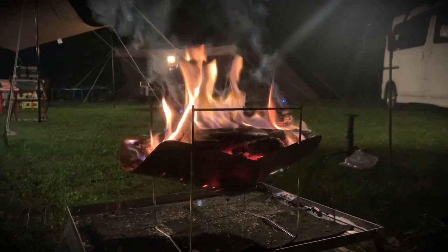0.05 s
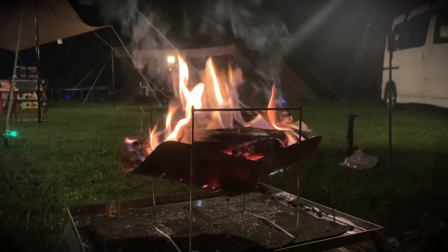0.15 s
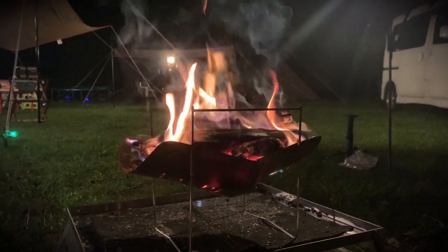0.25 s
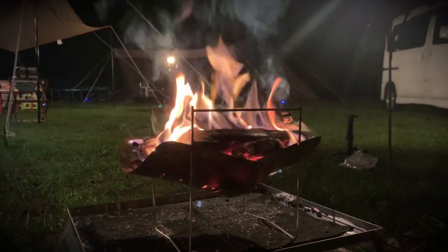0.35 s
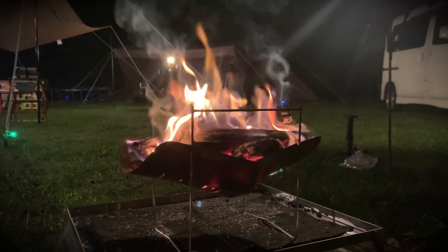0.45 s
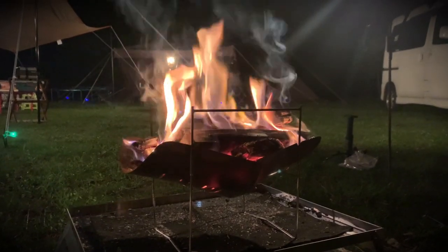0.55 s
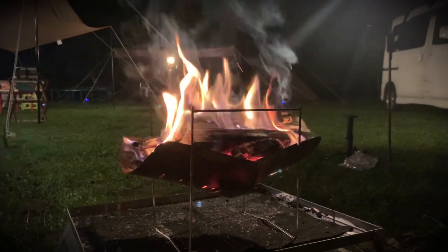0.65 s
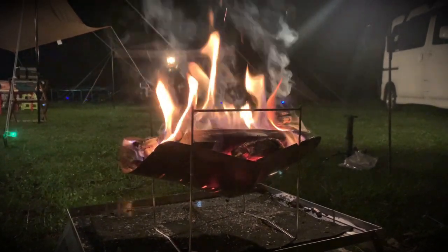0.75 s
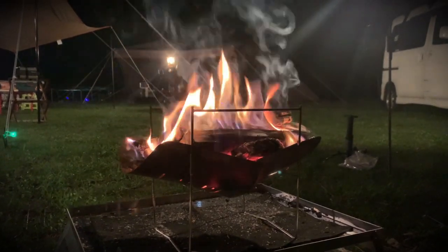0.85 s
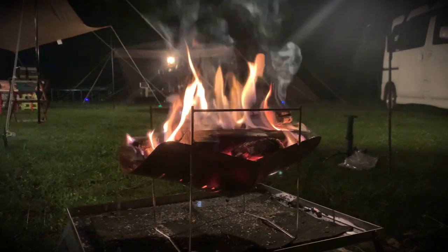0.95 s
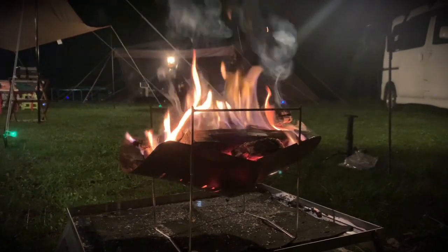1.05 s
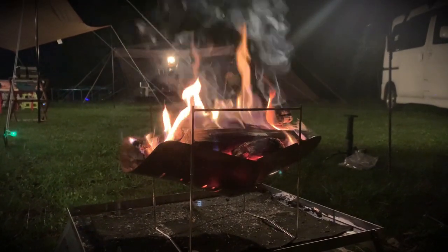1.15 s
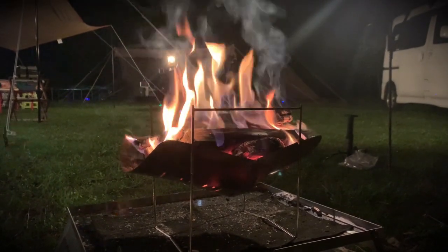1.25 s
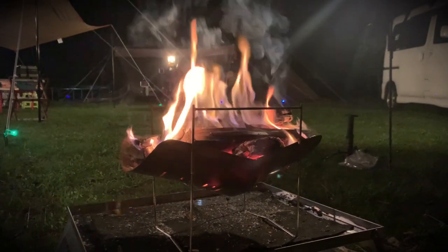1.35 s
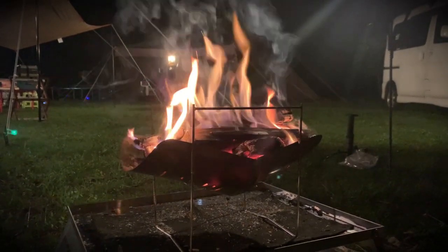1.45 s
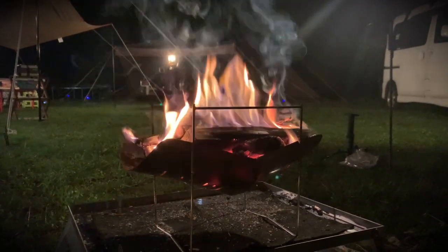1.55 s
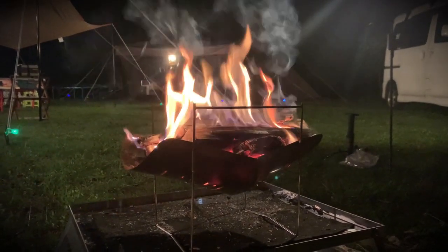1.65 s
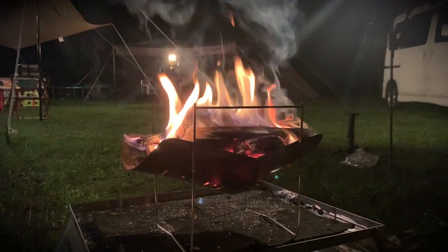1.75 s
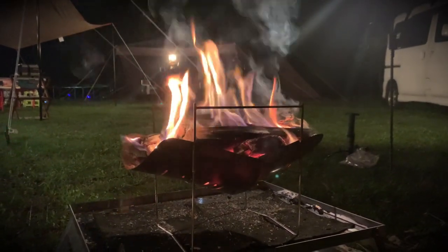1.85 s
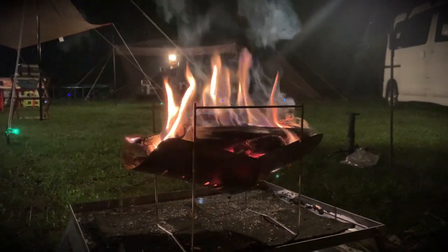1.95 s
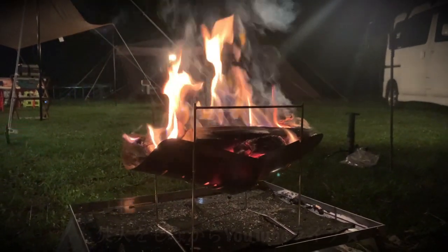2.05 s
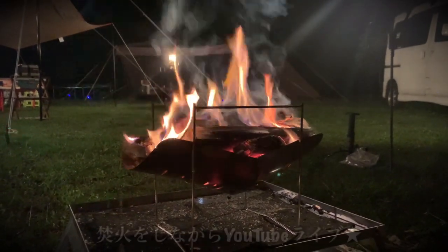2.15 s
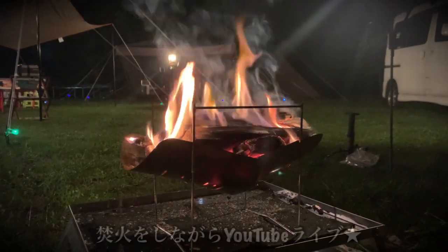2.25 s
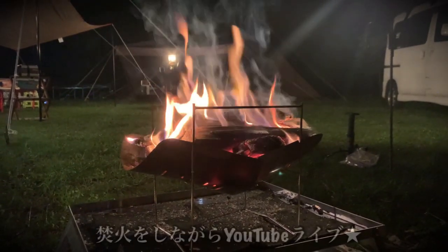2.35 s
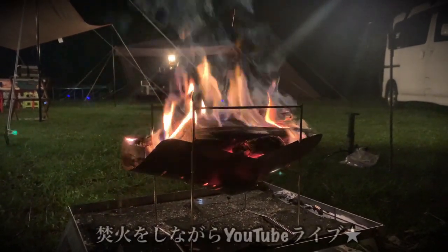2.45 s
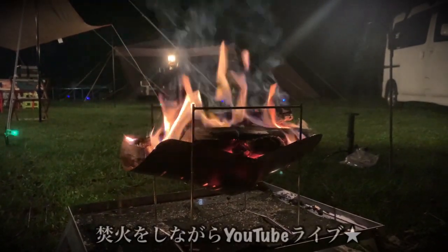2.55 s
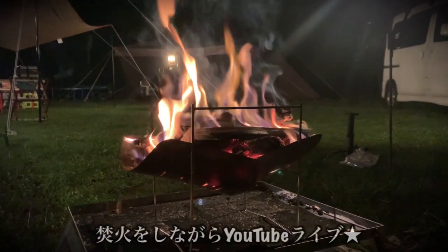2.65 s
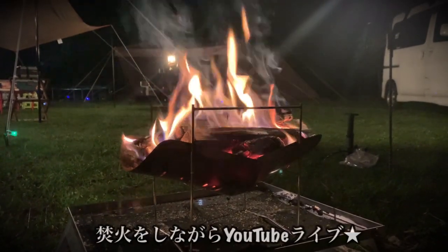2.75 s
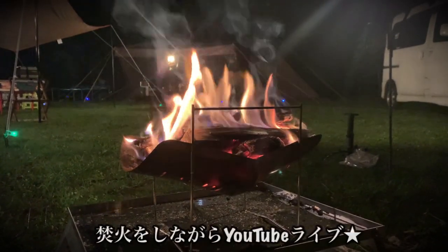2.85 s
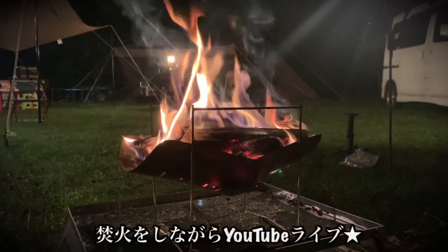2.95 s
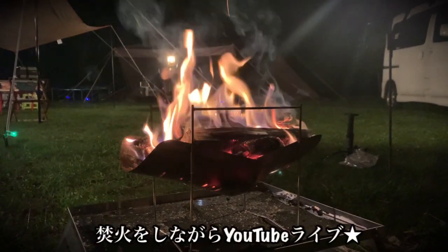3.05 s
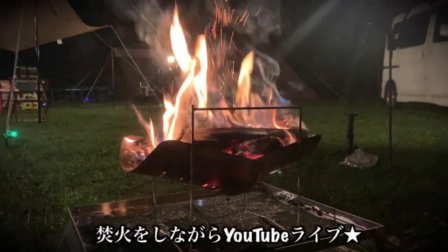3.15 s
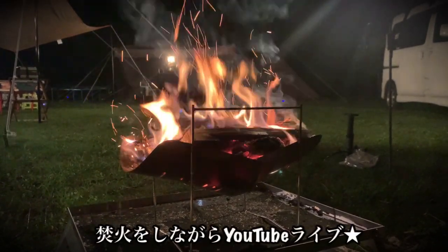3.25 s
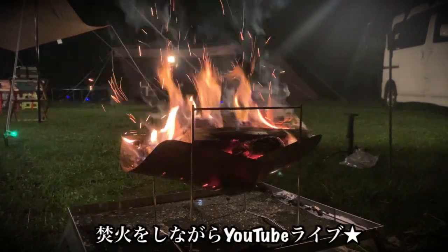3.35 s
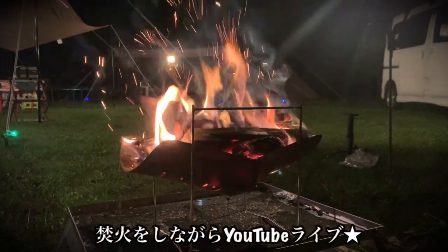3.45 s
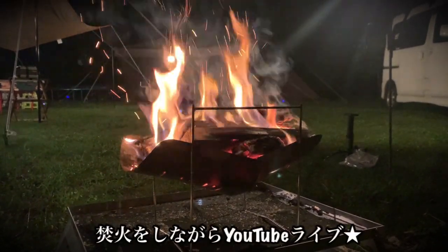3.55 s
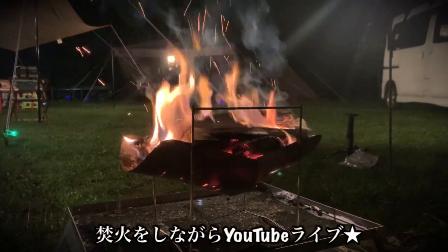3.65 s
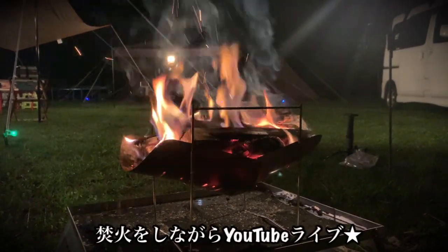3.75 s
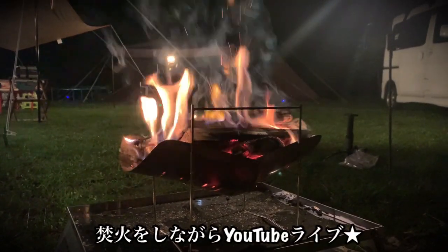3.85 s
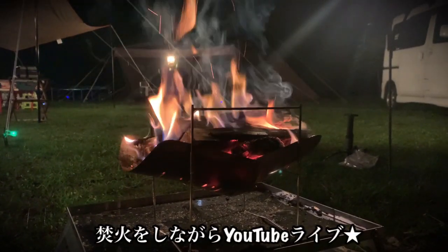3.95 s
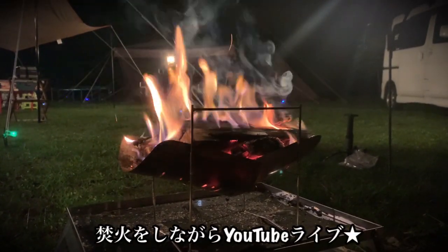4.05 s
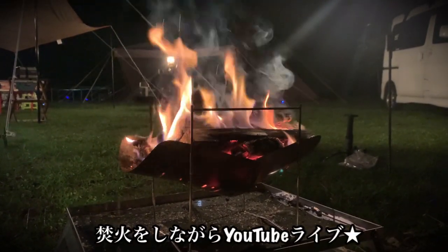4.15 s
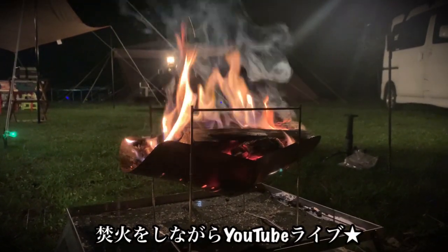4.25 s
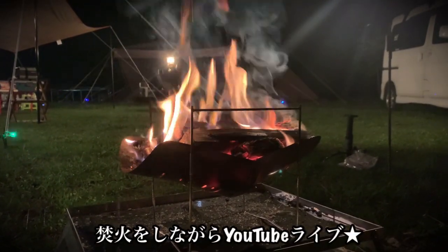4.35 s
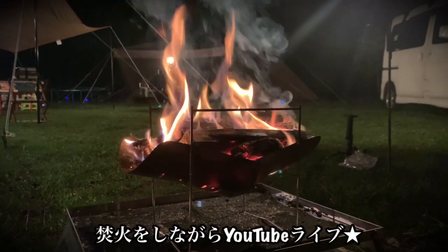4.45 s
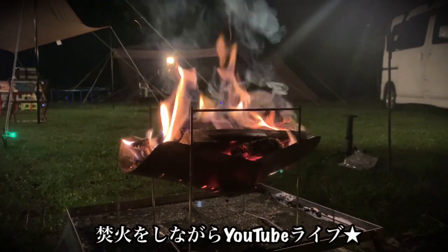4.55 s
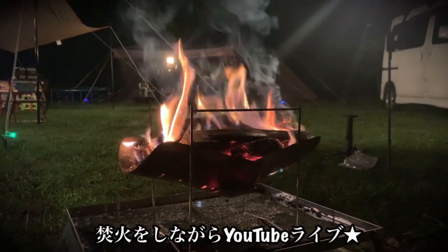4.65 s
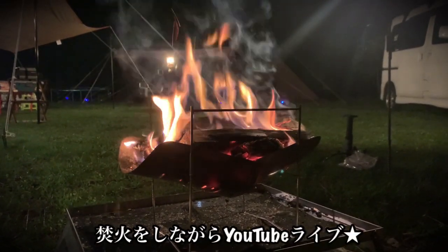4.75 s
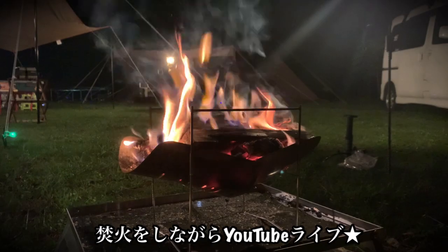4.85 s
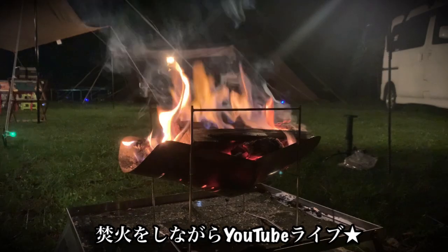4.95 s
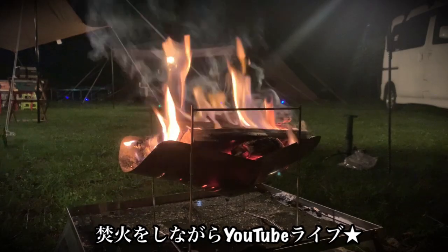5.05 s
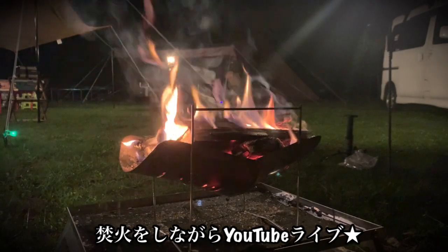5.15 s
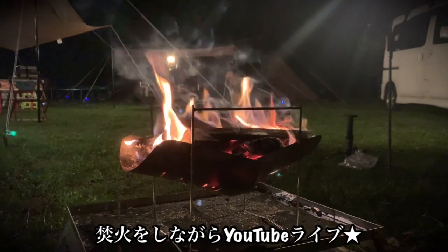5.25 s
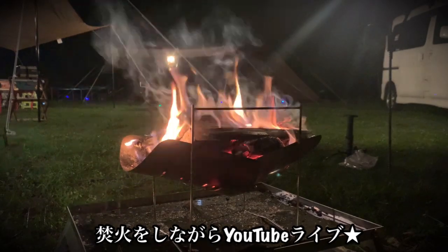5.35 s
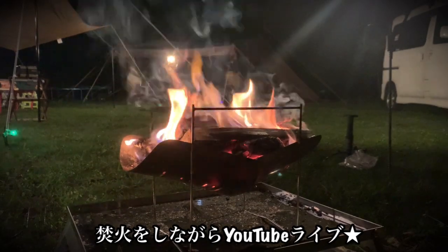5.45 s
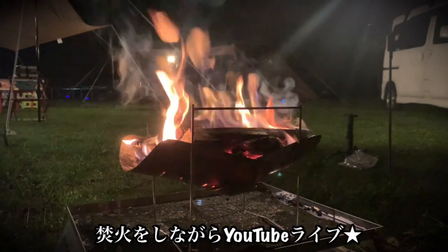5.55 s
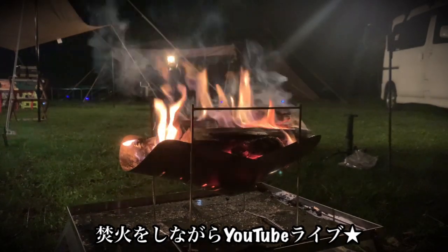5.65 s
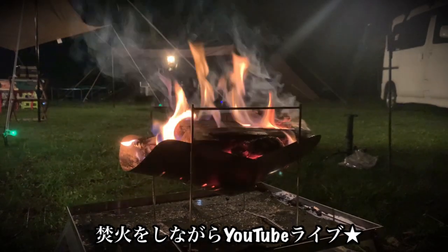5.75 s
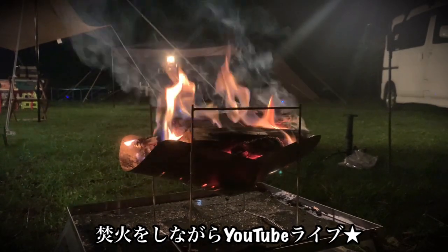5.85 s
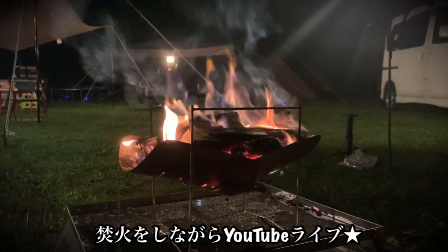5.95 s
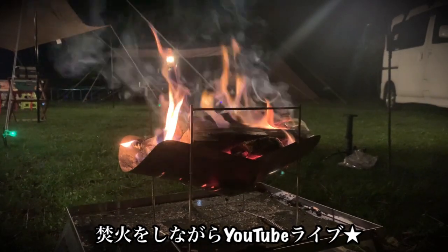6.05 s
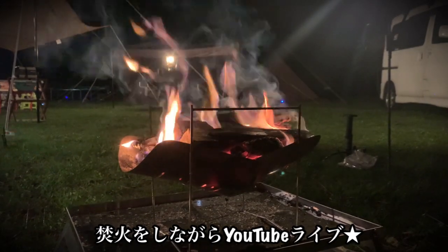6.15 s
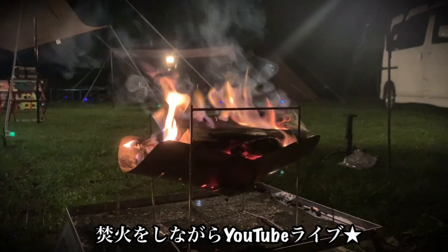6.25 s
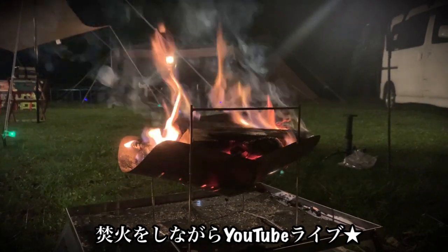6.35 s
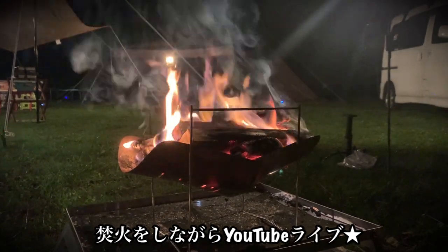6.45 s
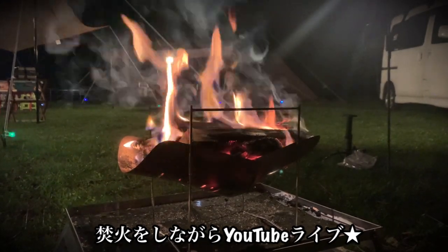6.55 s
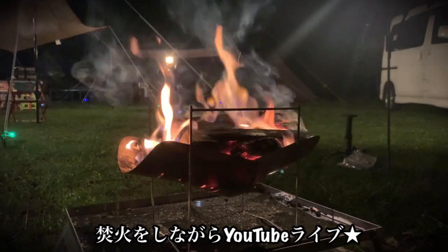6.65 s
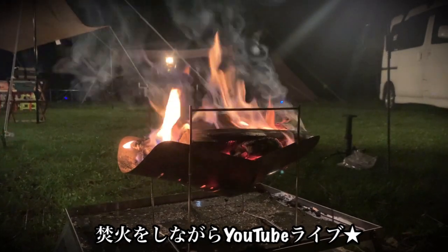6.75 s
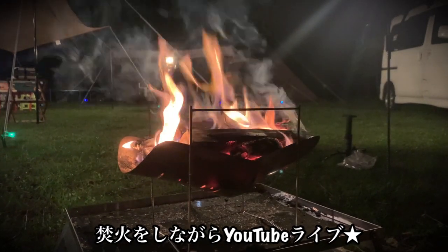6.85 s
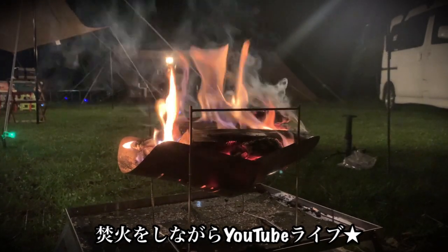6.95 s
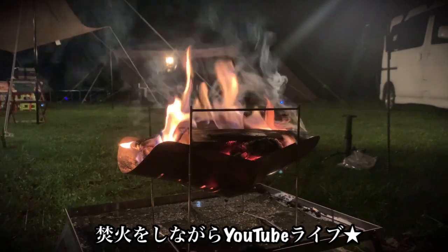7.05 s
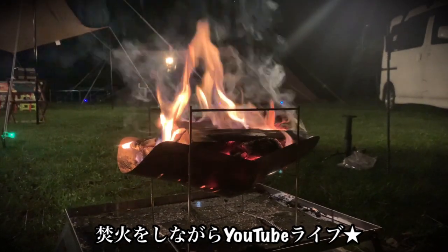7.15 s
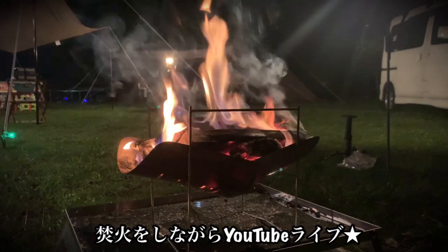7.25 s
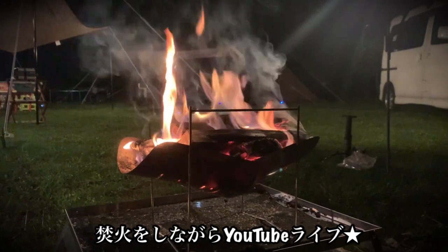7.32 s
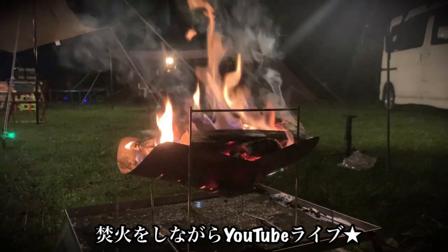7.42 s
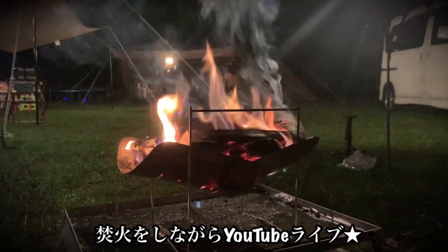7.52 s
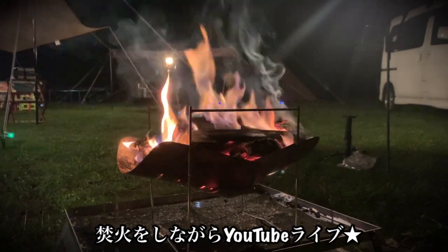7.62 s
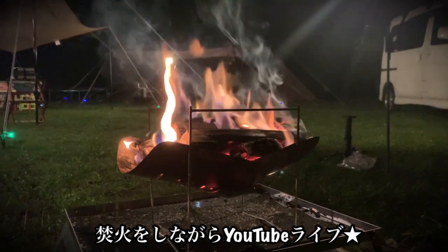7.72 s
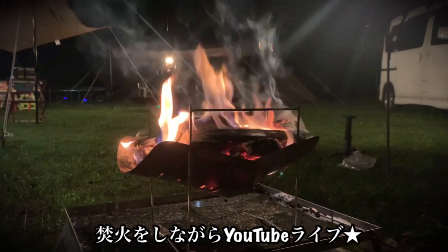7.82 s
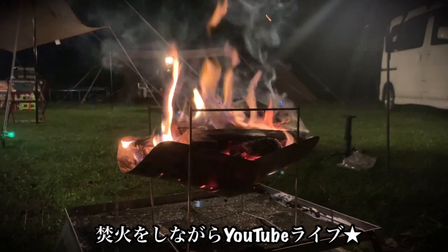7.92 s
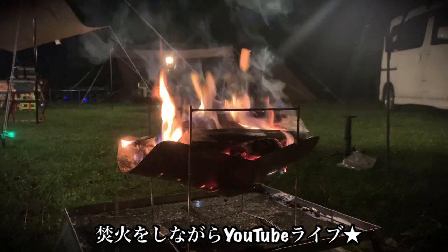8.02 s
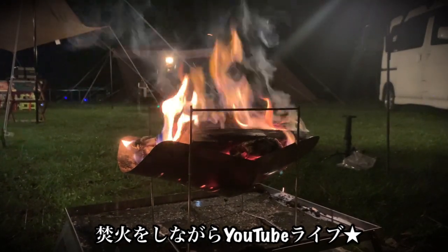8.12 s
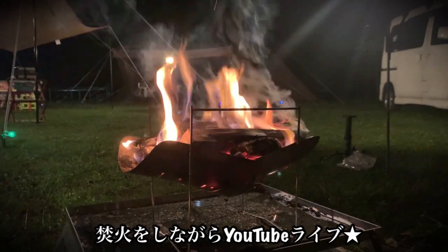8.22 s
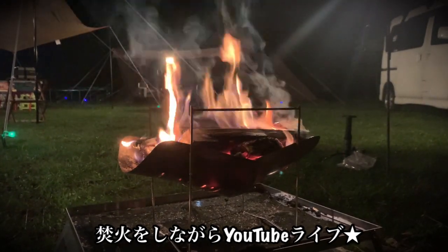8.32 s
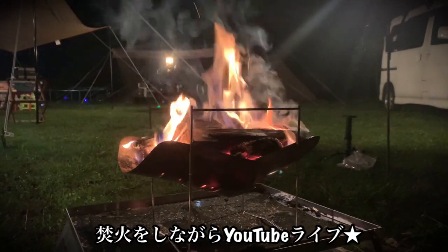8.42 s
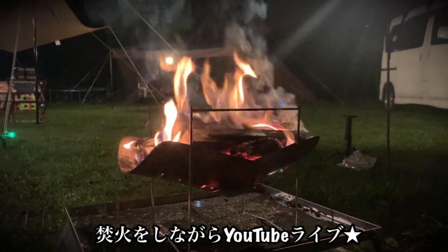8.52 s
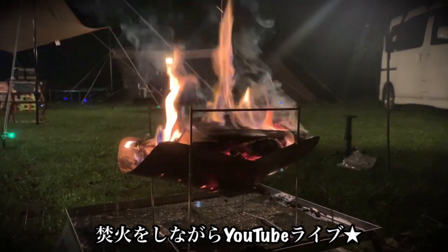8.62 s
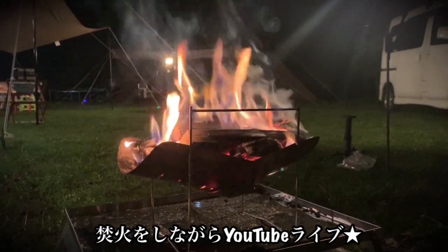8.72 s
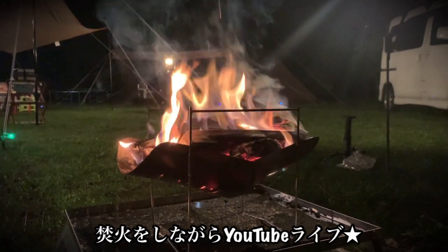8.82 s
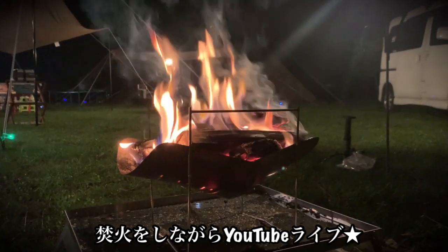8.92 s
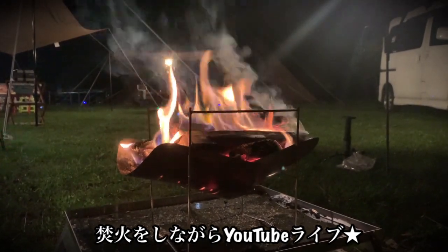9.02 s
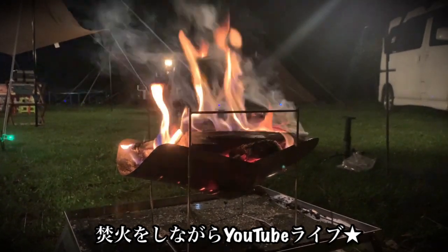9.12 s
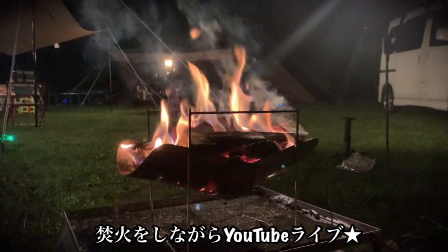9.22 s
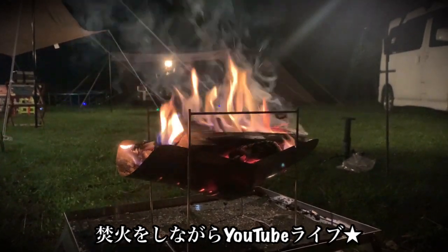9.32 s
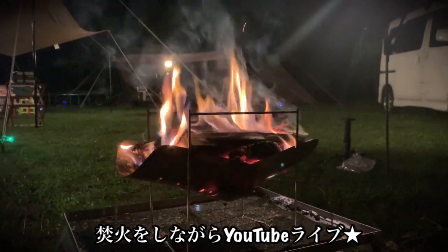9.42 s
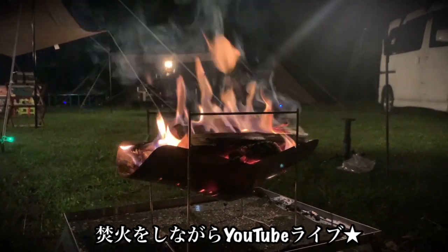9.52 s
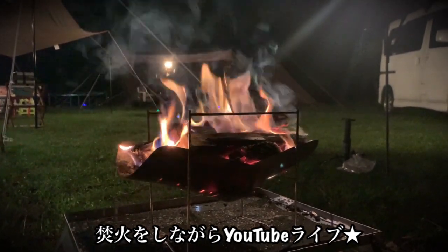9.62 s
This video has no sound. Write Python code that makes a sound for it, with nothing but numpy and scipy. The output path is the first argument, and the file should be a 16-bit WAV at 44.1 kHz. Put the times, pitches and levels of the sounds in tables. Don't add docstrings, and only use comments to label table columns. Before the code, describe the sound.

Flames rumble softly under a bright sizzle of boiling sap, with a breathy steam whistle swelling around three seconds. Dry pops and tiny snaps come irregularly, several loud in the first two seconds. The biggest, just after three, overloads the microphones and the sound ducks for a moment. Quieter crackle follows, then a woody crack near seven and a hissing spurt near nine. Open outdoor air, close stereo.

```python
import sys
import numpy as np
from scipy import signal
from scipy.fft import rfft, irfft, next_fast_len
from scipy.io import wavfile

SR = 44100
rng = np.random.default_rng(int(sys.argv[2]) if len(sys.argv) > 2 else 0)


def generate_wav(sig):
    pcm = np.round(np.clip(np.atleast_2d(sig).T, -1, 1) * 32767).astype(np.int16)
    wavfile.write(sys.argv[1], SR, pcm)


def gain_from_decibels(decibels):
    exponent = np.asarray(decibels, float) / 20
    return 10 ** exponent


N = 426888
TIME = np.arange(N) / SR
SIZE = next_fast_len(N)
HZ = np.maximum(np.fft.rfftfreq(SIZE, 1 / SR), 1)
LEFT_LAG_S = 14 / 44100
IN_PHASE_HZ = 850

# (f/Hz, share 0-1)
STRAIGHT_SHARE = [(40, 0.94), (120, 0.99), (250, 0.87), (500, 0.65), (1400, 0), (2600, 0.25), (4400, 0),
                  (8000, 0.28), (9000, 0.23), (10200, 1), (15000, 1)]
# (t/s, level/dB about its mean)
BLAZE_VIGOUR = [(0, 1), (.8, 0.5), (1.2, -1), (1.55, .5), (1.95, 1), (2.4, -.5), (2.6, 3), (3.0, -0.5),
                (3.35, 2), (3.9, 3), (4.4, 1), (5.4, 2), (6.8, 0.8), (7.2, 2), (8.7, 0.8), (9.05, 2.7),
                (9.3, 0), (9.68, 1.5)]


def rms_one(x):
    return x / np.sqrt(np.mean(x ** 2) + 1e-20)


def in_time(rows):
    return np.interp(TIME, *np.transpose(rows))


def at_hz(points, hz):
    table_hz, value = np.transpose(points)
    return np.interp(np.log(hz), np.log(table_hz), value)


def band(x, low_hz, high_hz):
    return signal.sosfilt(signal.butter(2, [low_hz, high_hz], "band", fs=SR, output="sos"), x)


def drift(rate):
    r = np.exp(-80 * np.pi * rate / SR)
    chance = rng.standard_normal(N // 40 + 2002)
    return rms_one(signal.lfilter([1], [1, -2 * r, r * r], chance)[2000:])


def fire_noise(spectrum, lag_s, count, own_db, shared_db, rate):
    # (f/Hz, left minus right/dB)
    left_lean = [(60, -2.5), (130, -1.5), (290, 0), (640, 0.5), (1410, 0.5), (3100, 1), (6820, -3),
                 (15000, 1)]
    common, left, right = rfft(rng.standard_normal((3, SIZE)))
    direct = np.clip(at_hz(STRAIGHT_SHARE, HZ), 0, 1)
    late = np.exp(-2j * np.pi * (HZ - IN_PHASE_HZ) * lag_s)
    pair = np.sqrt(direct) * common * [late, 1 + 0 * late]
    pair = pair + np.sqrt(1 - direct) * np.array([left, right])

    lean = gain_from_decibels(at_hz(left_lean, HZ) / 2)
    low, high = spectrum[0][0], spectrum[-1][0]
    pair = pair * [lean, 1 / lean] * gain_from_decibels(at_hz(spectrum, HZ))
    pair = pair * (HZ < high) * np.minimum(HZ / low, 1) ** 4

    place = np.clip(np.log(HZ / low) / np.log(high / low), 0, 1) * (count - 1)
    together = shared_db * drift(rate)
    out = 0
    for k in range(count):
        part = irfft(pair * np.maximum(1 - abs(place - k), 0), SIZE)[:, :N]
        flicker = gain_from_decibels(together + own_db * drift(rate))
        out = out + part * np.interp(np.arange(N) / 40, np.arange(len(flicker)), flicker)
    return rms_one(out)


def flames():
    # (f/Hz, level/dB per Hz)
    rumble_colour = [(15, -49), (25, -26), (59, 0), (124, -1.5), (219, -7), (269, -10), (387, -17),
                     (453, -17.5), (506, -14.5), (584, -17.5), (740, -12), (1100, -35.5), (1430, -79),
                     (2420, -120)]
    level_db = -44 + 0.52 * in_time(BLAZE_VIGOUR)
    return gain_from_decibels(level_db) * fire_noise(rumble_colour, 0, count=5, own_db=2.5, shared_db=1.5, rate=11.4)


def steam_whistle():
    # (f/Hz, level/dB per Hz)
    whistle_colour = [(1800, -19), (2050, -19.5), (2280, -7.5), (2500, -15), (2800, -40)]
    # (t/s, level/dB)
    crack_pressure = [(0, -61), (1.7, -61.5), (1.91, -55.5), (2.18, -62.5), (2.45, -60), (2.59, -51.5),
                      (3.1, -49), (3.31, -45), (3.45, -56), (3.7, -57), (4.34, -63), (5.2, -54), (5.7, -57),
                      (6.2, -60.5), (6.8, -62), (8.7, -60), (9.05, -57.5), (9.68, -64)]
    noise = fire_noise(whistle_colour, 0, count=2, own_db=2.5, shared_db=0.8, rate=19.0)
    return gain_from_decibels(in_time(crack_pressure)) * noise


def sap_hiss():
    # (f/Hz, level/dB per Hz)
    hiss_colour = [(1050, -11), (1550, -5.5), (1900, -14.5), (2500, -5), (2820, -14.5), (3200, 0),
                   (3600, 2), (3950, -3), (4300, 4), (4700, -3), (5300, 0), (5900, -9), (7200, -4.5),
                   (8600, -11)]
    level_db = -48 + 0.59 * in_time(BLAZE_VIGOUR)
    return gain_from_decibels(level_db) * fire_noise(hiss_colour, LEFT_LAG_S, count=4, own_db=0.4, shared_db=0.89, rate=13.0)


def fine_sizzle():
    # (f/Hz, level/dB per Hz)
    sizzle_colour = [(7000, -25), (8800, -3), (10100, -2), (11500, -4), (12500, 3.5), (13500, -2),
                     (14800, -4.5), (15600, 4.5), (16000, -32)]
    level_db = -53 + 1.1 * in_time(BLAZE_VIGOUR)
    noise = fire_noise(sizzle_colour, LEFT_LAG_S, count=2, own_db=-0.1, shared_db=1.64, rate=19.0)
    return gain_from_decibels(level_db) * noise


def ticks(per_s, level_db):
    sizes = gain_from_decibels(3.8 * np.minimum(rng.exponential(1, N), 3.5)) * rng.choice([-1, 1], N)
    clicks = sizes * (rng.random(N) < per_s / SR)
    tail = rng.standard_normal((2, 300)) * gain_from_decibels(-60 * np.arange(300) / SR / 0.004)
    pair = signal.fftconvolve(clicks[None], tail, axes=1)[:, :N]
    return gain_from_decibels(level_db) * band(pair, 3500, 14000)


def burst(scatter_db, length):
    # (delay/s, left gain, right gain)
    first_echoes = [(.0007, 0.45, -1.42), (.0014, -0.59, 1), (.0022, .4, .7), (.0031, 0.16, -0.027)]
    scatter_s = 0.0056
    t = np.arange(length) / SR
    chance = rng.standard_normal((4, length))
    sparse = chance[:2] * abs(chance[2:]) ** 1.44
    wave = 0.16 * sparse * np.exp(-t / scatter_s) * (t > .0006)
    for k, (delay_s, left, right) in enumerate(first_echoes):
        at = round(delay_s * SR * (1 + 0.16 * chance[0, k]))
        wave[:, at] += np.array([left, right]) * (1 + 0.11 * chance[2:, k])
    wave = wave * gain_from_decibels(scatter_db + 7.5)
    lag = round(LEFT_LAG_S * SR) + 1
    wave[0, lag:lag + 2] = 1.376
    wave[1, :2] = 0.71
    return wave


def pops():
    # (t/s, peak level/dB, body level/dB, top level/dB)
    sharp_pops = [(.134, -25, -12.5, -4), (.3668, -19, -18.5, -3), (.8612, -2, -22, -12),
                  (.9996, -5.5, -14.5, -10.5), (1.2345, -18, -29, -12), (1.3887, -15, -24, -19),
                  (1.526, -16, -14.5, -7), (1.688, -18, -7.5, -2), (1.7272, 10, -18.5, -18),
                  (1.9402, 3.5, -15, -15), (2.026, -10, -15, -6), (2.359, -20, -27, -17),
                  (3.0702, 5, -15.5, -18), (3.532, -18, -3, 2), (3.7148, -23.5, -12, -4),
                  (3.8294, -14, -16, -9), (4.462, -24.5, -9, -7), (5.78, -18.5, -23, -17),
                  (5.9885, -25, -17.5, -4), (6.3766, -22, -17, 2.5), (7.1843, -8.5, -5.5, -15),
                  (7.6088, -20, -24, -0.5), (7.8762, -21, -23, -16), (8.8796, -19.5, -22, -2.5),
                  (8.9035, -21, -13, -22), (9.4166, -25.5, 1, 5)]
    # (t/s, peak level/dB, brightness/dB)
    faint_snaps = [(.2528, -35, -10), (.4803, -32.5, -3), (.704, -36, 7), (0.95, -29, 0),
                   (1.0301, -32.5, 8), (1.262, -25.5, 4), (1.8537, -42, -1), (4.014, -26.5, 0.5),
                   (4.096, -26.5, 2.5), (4.1147, -31, 5), (4.1806, -28.5, 11), (4.2504, -36, -18),
                   (4.3223, -31.5, 3), (5.1813, -33, 8), (5.2862, -29.5, 7.5), (6.3614, -35, 5),
                   (6.4576, -30, -3), (6.5285, -24.5, 1.5), (6.538, -28.5, 7), (6.9234, -41, -4),
                   (7.4502, -37, 5), (7.5135, -37, 10), (7.5659, -38, 7), (7.9231, -33, 7),
                   (8.25, -24.5, 3), (8.508, -31.5, -3), (9.1525, -27.5, 3), (9.404, -28, 9),
                   (9.489, -28, 2), (9.6584, -27.5, 0.5)]
    # (low f/Hz, high f/Hz)
    colour_bands = [
        (350, 1160),
        (1800, 3910),
        (4300, 10100),
        (8800, 15900),
    ]
    band_fades = [0, 20, 120, 150]
    length = 1000
    snaps = [(s, db, -16.5 - bright, -6.5 + bright) for s, db, bright in faint_snaps]
    s, peak_db, body_db, top_db = np.transpose(sharp_pops + snaps)
    scatter_db = -9.5 + 0.061 * peak_db
    waves = np.array([burst(db, length) for db in scatter_db])

    knock_db = np.minimum(body_db - 12, -23.5)
    bands_db = [knock_db + 8.5, body_db + 11.5, 0 * s - 1.5, top_db + 11.5]
    sounds = 0
    for k, (low_hz, high_hz) in enumerate(colour_bands):
        part = band(waves * np.exp(-band_fades[k] * TIME[:length]), low_hz, high_hz)
        gain = gain_from_decibels(peak_db + bands_db[k]) / abs(part).max(axis=(1, 2))
        sounds = sounds + (-1) ** k * part * gain[:, None, None]

    out = np.zeros((2, N + length))
    for at, sound in zip(np.round((s + 0.00082) * SR).astype(int), sounds):
        out[:, at:at + length] += sound
    return out[:, :N]


def ring(x, modes):
    out = 0
    for hz, level_db, t60 in modes:
        r = gain_from_decibels(-60 / (t60 * SR))
        w = 2 * np.pi * hz / SR
        out = out + gain_from_decibels(level_db) * signal.lfilter([0, np.sin(w)], [1, -2 * r * np.cos(w), r * r], x)
    return out


def splits():
    # (t/s, blow level/dB, modes (f/Hz, level/dB, 60 dB decay/s))
    jolted_logs = [
        (3.0702, 3.5, [(970, -2, .015), (1690, 2, 0.012), (1842, 7, 0.016), (2144, 6, 0.02)]),
        (3.0735, -0.5, [(154, 3, 0.028), (240, -3, 0.025), (311, -5.5, 0.027), (440, -19, 0.027)]),
        (4.2515, -22.5, [(287, 2, 0.027), (365, -3.5, 0.028), (754, -4.5, 0.055)]),
        (7.185, -14.5, [(142, -5, 0.03), (467, -11, 0.017), (910, 2.5, 0.0083), (1750, -6, 0.031), (2220, 8, 0.015), (3200, -5, 0.0045)]),
        (1.7285, -18.5, [(152, 0, 0.03), (322, -5, 0.025), (2205, 15, 0.016)]),
        (1.9412, -32, [(910, -12, 0.014), (2380, -15, 0.0091), (4430, 21, 0.005)]),
    ]
    out, length = np.zeros((2, N)), 4000
    lag = round(LEFT_LAG_S * SR / 2)
    push = np.exp(-np.arange(length) / 2.0) / 3
    for s, blow_db, modes in jolted_logs:
        sound = gain_from_decibels(blow_db) * band(ring(push, modes), 110, 9000)
        at = round(s * SR)
        out[0, at + lag:at + lag + length] += sound
        out[1, at:at + length] += sound
    return out


def spurts():
    # (t/s, rise/s, 60 dB fall/s, level/dB, centre f/Hz)
    steam_pockets = [(1.852, 0.0031, 0.076, -42.5, 1860), (1.871, 0.014, .04, -37, 246),
                     (2.605, 0.0032, .04, -48, 2190), (3.055, .016, .0031, -13.5, 2630),
                     (3.057, 0.0081, .012, -18.5, 550), (3.098, 0.0097, 0.38, -41, 2300),
                     (3.26, .063, .51, -48, 2100), (3.638, 0.0051, 0.039, -39.5, 900),
                     (6.292, 0.015, 0.13, -43, 2330), (6.358, .005, 0.041, -39.5, 2200),
                     (7.30, 0.014, .08, -45.5, 2020), (8.902, 0.0026, .042, -25, 4200),
                     (8.91, .005, 0.64, -42, 4700), (8.95, .1, 0.53, -40.5, 4570),
                     (8.92, .03, 0.51, -47, 5500)]
    out, length = np.zeros((2, N)), 20000
    t = np.arange(length) / SR
    for s, rise_s, fall_s, level_db, hz in steam_pockets:
        shared, left, right, grain = rng.standard_normal((4, length))
        alike = np.clip(at_hz(STRAIGHT_SHARE, hz), 0, 1)
        noise = np.sqrt(alike) * shared + np.sqrt(1 - alike) * np.array([left, right])
        width_hz = 720 * (hz / 1000) ** 1.1
        low_hz = np.sqrt(hz ** 2 + width_hz ** 2 / 4) - width_hz / 2
        jet = rms_one(band(noise * (0.32 + abs(grain)), low_hz, low_hz + width_hz))
        shape = np.minimum(t / rise_s, 1) ** 1.3 * gain_from_decibels(-60 * np.maximum(t - rise_s, 0) / fall_s)
        at = round(s * SR)
        out[:, at:at + length] += gain_from_decibels(level_db) * jet * shape
    return out


def scene():
    steady = flames() + steam_whistle() + sap_hiss() + fine_sizzle()
    return steady + ticks(per_s=31.0, level_db=-49.5) + pops() + splits() + spurts()


def microphones(x):
    left, right = rfft(x, SIZE)
    from_hz, to_hz = 7940, 9560
    share = np.clip((HZ - from_hz) / (to_hz - from_hz), 0, 1)
    late = np.exp(-2j * np.pi * (HZ - IN_PHASE_HZ) * LEFT_LAG_S)
    return irfft([(1 - share) * left + share * late * right, right], SIZE)[:, :N]


def roll_off(x):
    return signal.sosfilt(signal.butter(12, 16490, fs=SR, output="sos"), x)


def record(dry):
    # (t/s, gain/dB)
    gain_duck = [
        (3.08, 0.5),
        (3.13, -1.5),
        (3.16, -7),
        (3.21, -6.5),
        (3.28, -0.5),
    ]
    x = microphones(dry) * gain_from_decibels(in_time(gain_duck))
    x = signal.sosfilt(signal.cheby2(10, 50, 16600, fs=SR, output="sos"), x)
    return roll_off(np.clip(x, -1, 1))


dry = scene()
out = record(dry)
generate_wav(out)
```